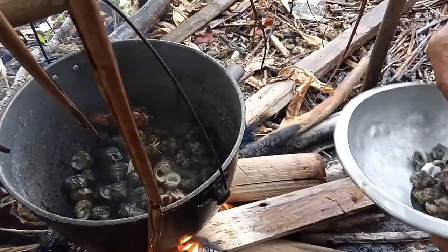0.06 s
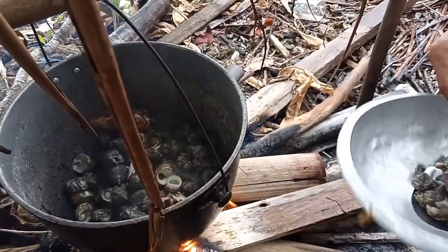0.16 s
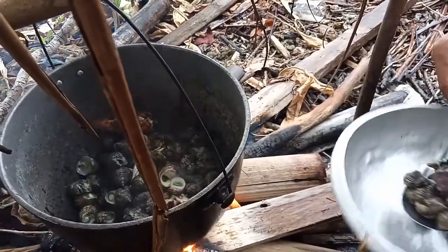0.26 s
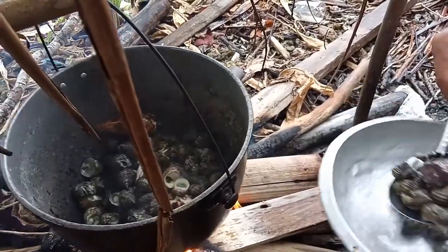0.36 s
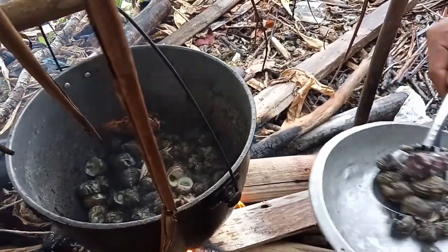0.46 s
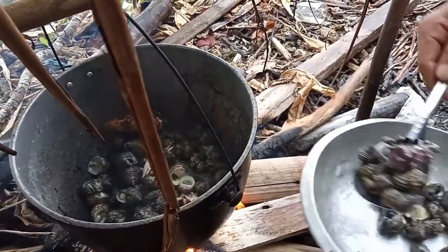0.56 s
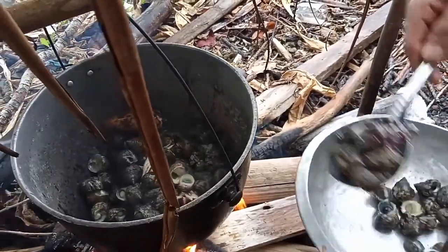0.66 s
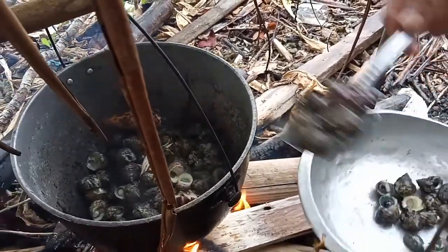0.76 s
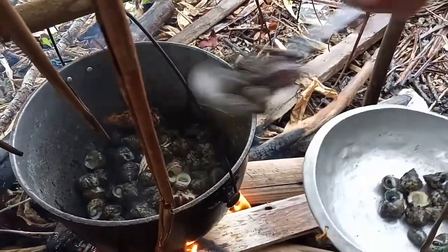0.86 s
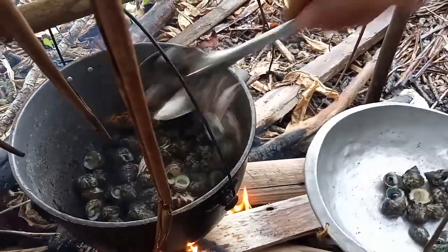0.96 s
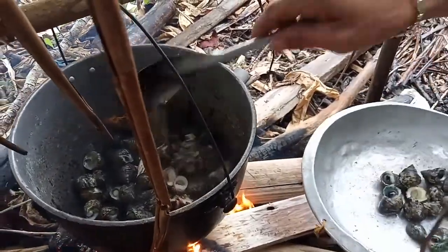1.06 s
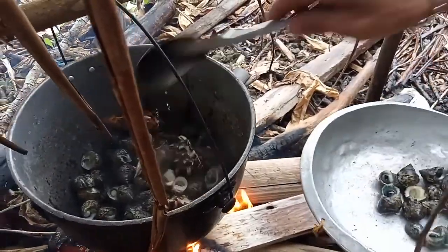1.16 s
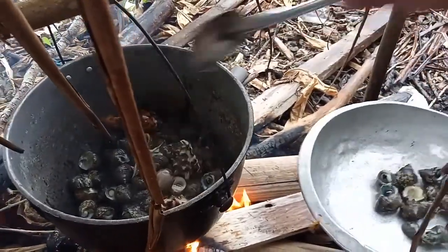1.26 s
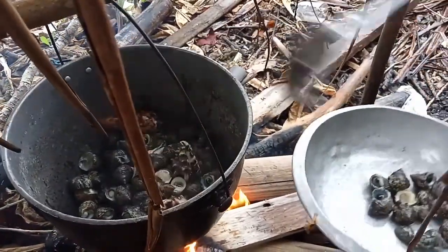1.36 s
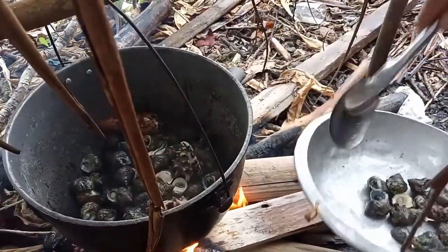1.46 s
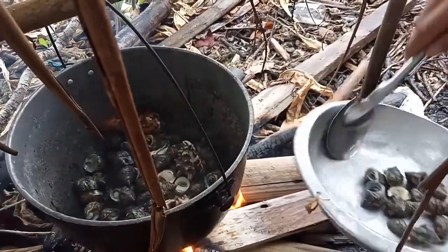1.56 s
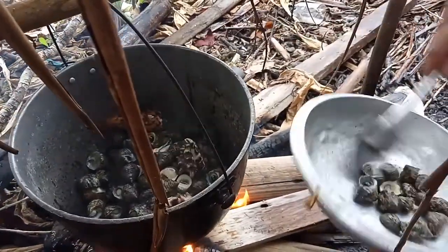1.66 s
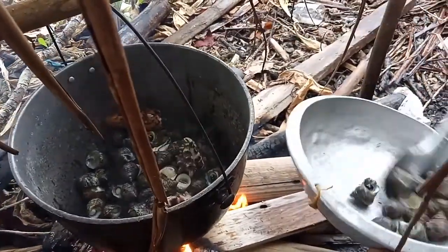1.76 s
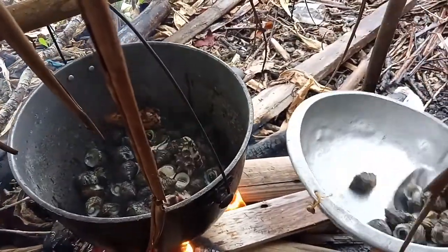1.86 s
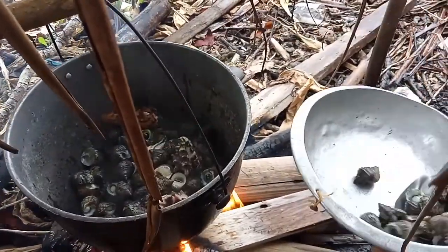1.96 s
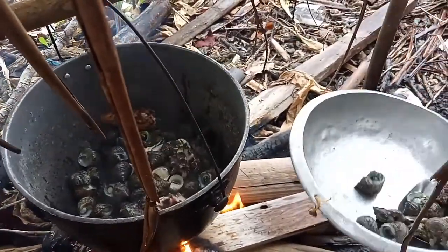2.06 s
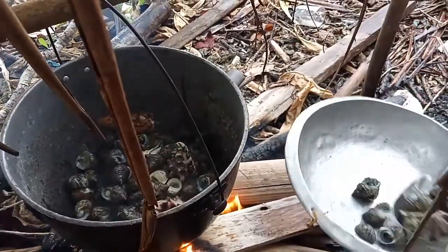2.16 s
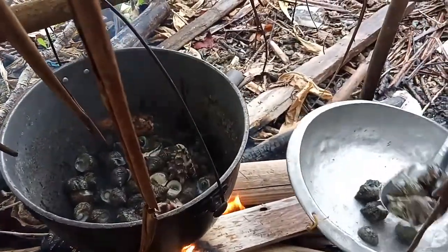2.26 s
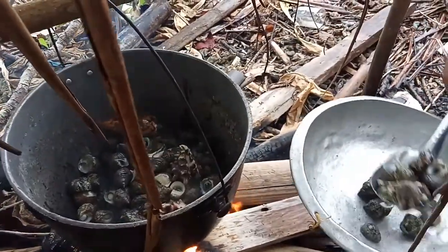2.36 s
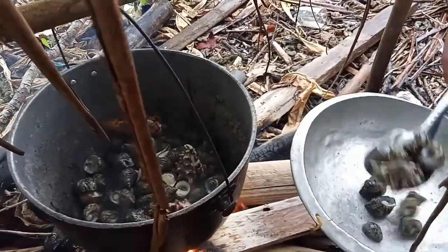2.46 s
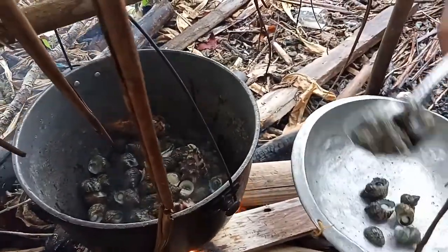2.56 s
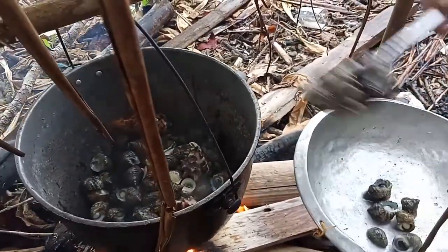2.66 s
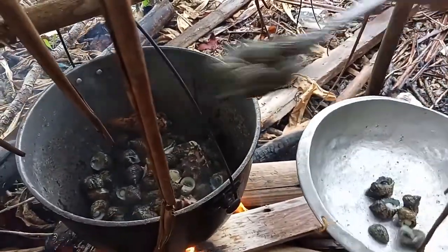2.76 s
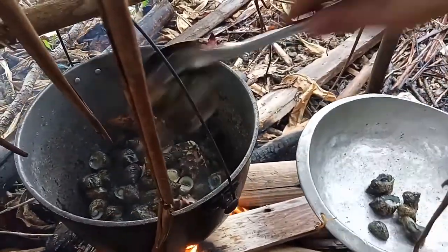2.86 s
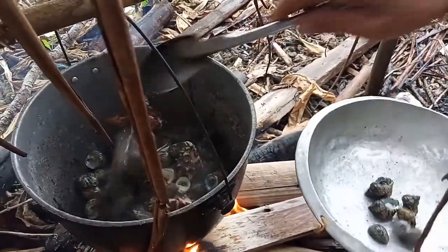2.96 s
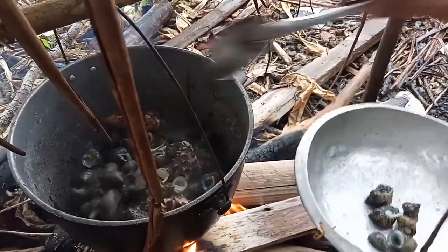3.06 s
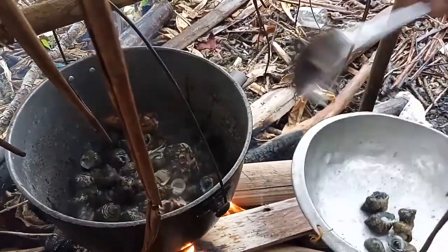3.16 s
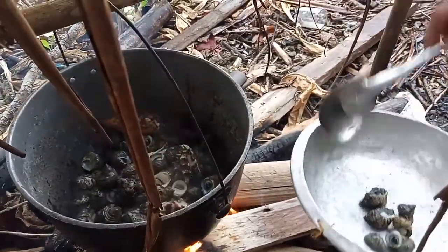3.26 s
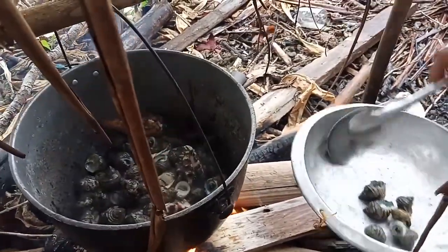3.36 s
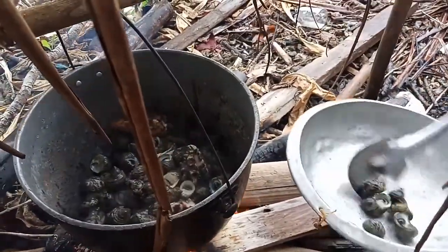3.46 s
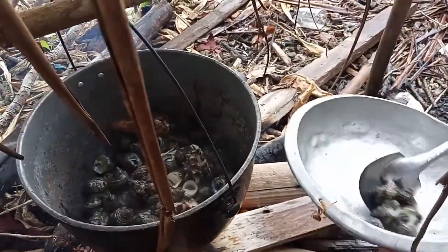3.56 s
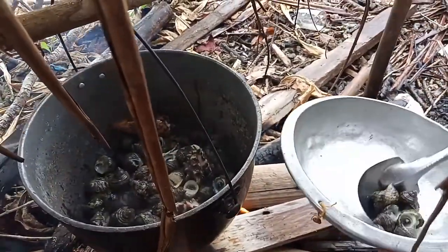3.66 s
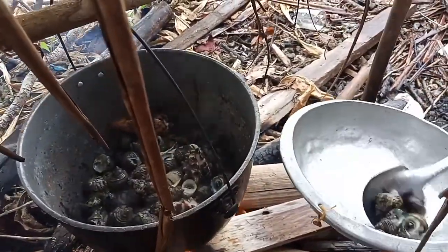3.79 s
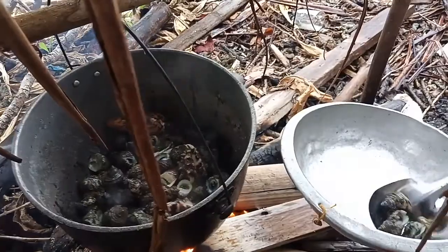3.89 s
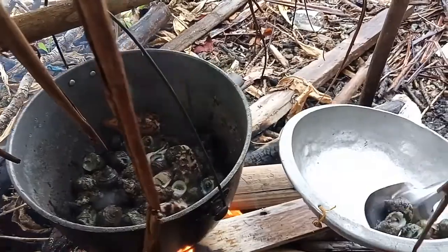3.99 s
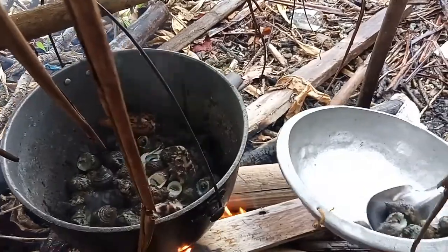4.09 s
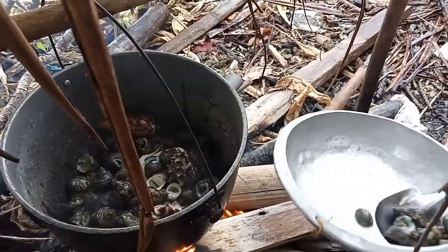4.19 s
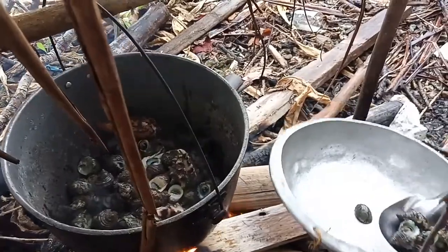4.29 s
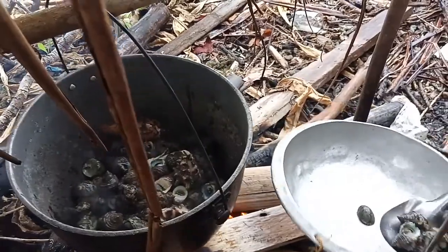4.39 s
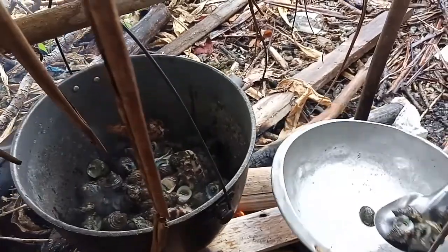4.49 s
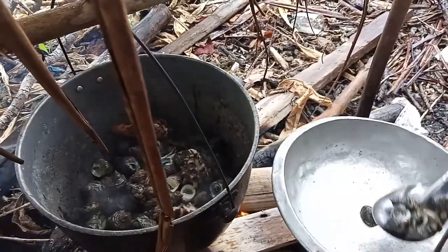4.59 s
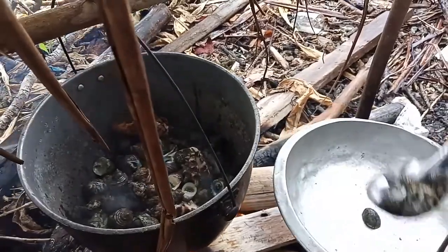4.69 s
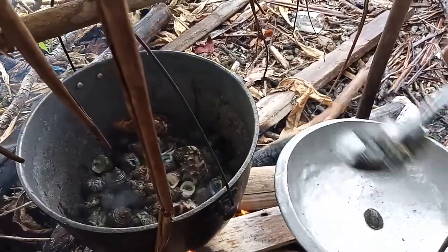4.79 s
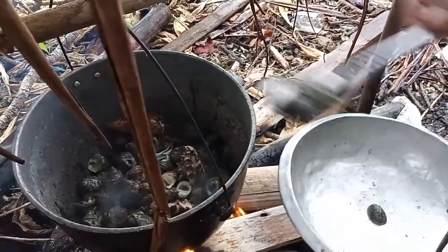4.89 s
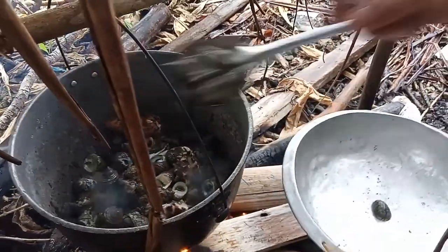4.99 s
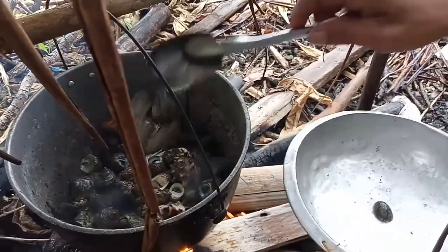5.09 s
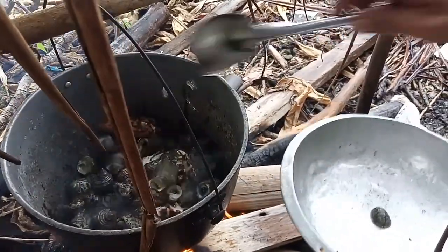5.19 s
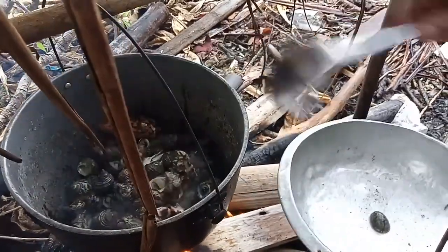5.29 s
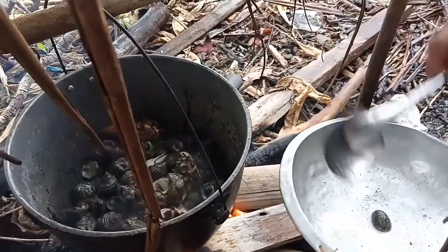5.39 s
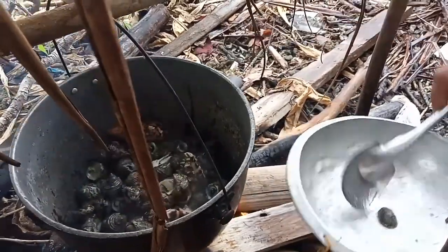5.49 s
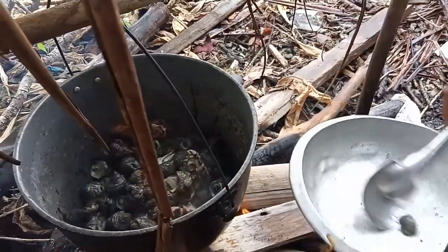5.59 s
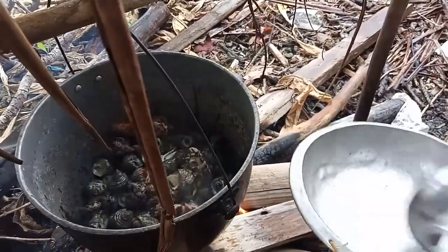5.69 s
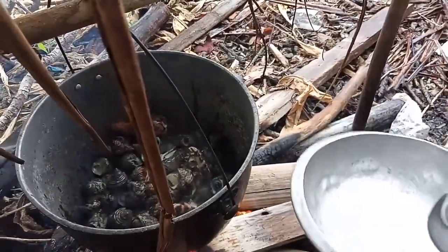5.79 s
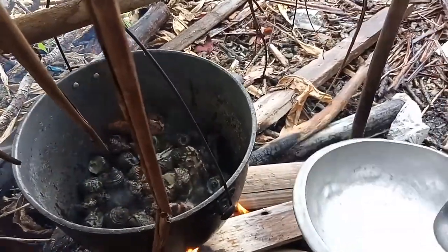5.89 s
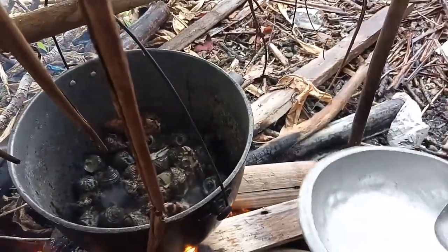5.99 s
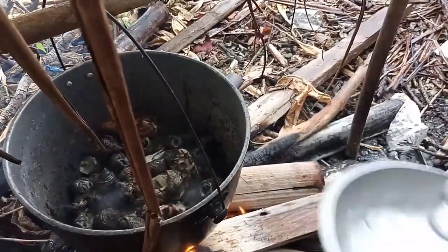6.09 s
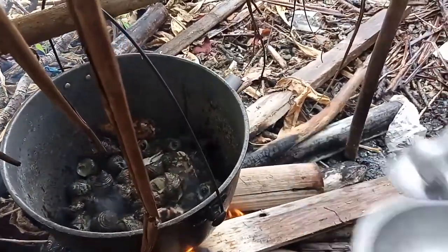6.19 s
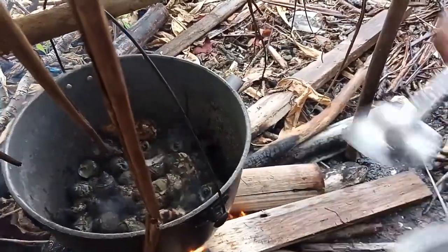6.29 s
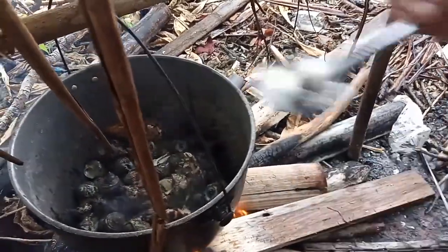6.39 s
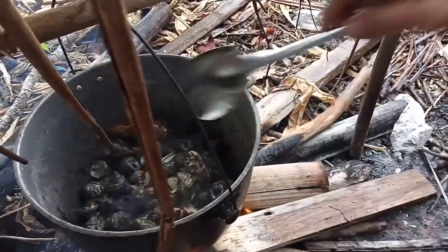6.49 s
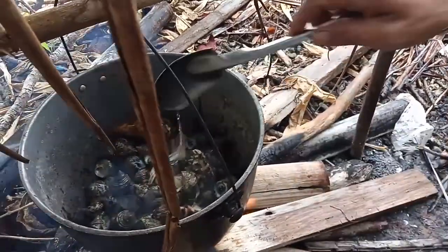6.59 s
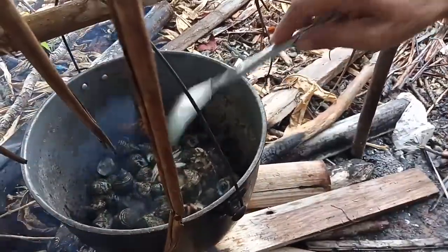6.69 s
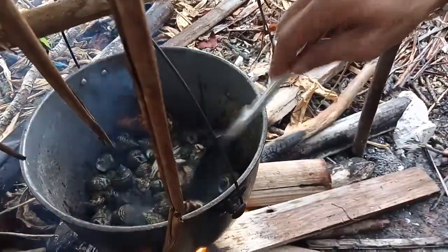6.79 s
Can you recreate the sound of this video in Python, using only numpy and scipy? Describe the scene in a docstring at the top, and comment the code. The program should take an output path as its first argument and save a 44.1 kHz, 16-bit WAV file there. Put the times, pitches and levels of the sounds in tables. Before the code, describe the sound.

Bright, clanky shell rattles alternate between a ringing metal basin and a duller pot, with steady sizzle and small fire pops close by.

```python
"""Scooping shells over a wood fire

Sea snail shells are scooped with a steel spoon from a thin metal basin and tipped into a pot over a wood fire.
Knocks are bursts of noise sent through the ringing notes of basin or pot, with a short shell note added.
Scrapes are rubbing noise and tiny clicks through the basin, plus singing metal; thuds are low, short swings.
Behind them, shaped noise makes the hot pot sizzle and the fire rumble, spit and whistle once.
"""
import sys
import numpy as np
from scipy import signal
from scipy.fft import rfft, irfft, next_fast_len
from scipy.io import wavfile
from scipy.ndimage import uniform_filter1d, map_coordinates

SR = 44100
rng = np.random.default_rng(int(sys.argv[2]) if len(sys.argv) > 2 else 0)


def file_out(sig):
    """Save sig as 16-bit WAV at sys.argv[1]."""
    # one column per channel
    cols = np.atleast_2d(sig).T
    # limit, then scale
    lim = np.clip(cols, -1, 1)
    pcm = np.round(lim * 32767).astype(np.int16)
    wavfile.write(sys.argv[1], SR, pcm)


N = 301996

# Spoon and shells on the basin; belly and treble are relative to the knock level:
# (time [s], level [dB], belly [dB], treble [dB], time for the contact to fade by 60 dB [s], shell pitch [Hz])
BASIN_HITS = [(1.5963, -5.5, -13.5, -11.5, .073, 2706), (1.6205, -6.5, -12, -8.5, 0.05, 2880),
              (1.6698, -26, -11, -20, 0.053, 1020), (1.6698, -14.5, -23, -5, .073, 3800),
              (1.684, -12.5, -30, -4, 0.1, 3970), (1.709, -1, -11, -14.5, 0.094, 2400),
              (1.737, -10, -8.5, -4, 0.063, 2320), (1.7593, -1.5, -17, -6, 0.059, 2400),
              (1.811, -10, -27, -21, 0.028, 3260), (1.8282, -8.5, -24, -7, .1, 3330),
              (1.855, -11.5, -25, -8, 0.07, 2920), (1.8674, -16, -10, -19, .058, 2470),
              (1.9265, -11, -10, -17, 0.05, 2390), (1.9391, -7, -24, -11.5, 0.019, 2360),
              (1.9982, -15, -21, -15, 0.051, 3010), (2.0901, -12.5, -19, -16, 0.017, 1580),
              (2.1264, -16, -8, -32, .15, 2440), (2.2423, -13, -7, 0, 0.059, 3880),
              (2.2847, -14, -10, -23, 0.09, 2780), (2.3146, -19, -11, -24, 0.044, 3000),
              (2.3765, -3, -7.5, -8.5, 0.048, 2040), (2.4054, -15.5, 3, -2, 0.072, 2220),
              (2.4116, -4.5, -10, -7.5, .062, 2280), (2.4972, 0, -10.5, -6, 0.042, 2990),
              (2.575, -15, -9.5, -8, 0.046, 2980), (2.6198, -24, -7, -12, .03, 1500),
              (2.7064, -23.5, 2.5, -18, .043, 2500), (2.7272, -24, -10, -24, .075, 3630),
              (2.7407, -18.5, -15, -27, 0.044, 3050), (3.3753, 0.5, -16, -10, 0.038, 2150),
              (3.4475, -7.5, -12, -6.5, 0.097, 2617), (3.4886, -13, -32, -24, .063, 4030),
              (3.5284, 1, -19, -9.5, 0.067, 3030), (3.5887, -8, -8.5, -9, 0.041, 2980),
              (3.6136, -8, -16, -8, 0.15, 2410), (3.6435, -15, -29, -16, 0.059, 3200),
              (3.8627, -9.5, -32, -8.5, 0.17, 3020), (3.9053, -17.5, -36, -27, .15, 3200),
              (3.9475, -15, -12.5, -10, 0.07, 2940), (4.0313, -27.5, 2, -22, .11, 2840),
              (4.1457, -13.5, -12.5, -10, 0.087, 1950), (4.1994, -15.5, -13, -18, 0.086, 3130),
              (4.2383, -12.5, -22, -30, 0.053, 3090), (4.4752, -20, -20, -12, 0.049, 2920),
              (4.69, -21.5, -6.5, -15, .023, 2750), (5.6022, -28, -5, -9, 0.051, 1790),
              (5.6251, -3, -15, -10, .11, 3650), (5.6464, -7.5, -17, -13.5, 0.23, 2990),
              (5.7261, -8.5, -10, -14, 0.039, 2980), (5.7577, -7, -23, -12, .1, 1920),
              (5.8067, -9, -12, -7.5, 0.16, 2400)]
# Shells landing in the pot or shifting in the spoon, same columns:
# (time [s], level [dB], belly [dB], treble [dB], time for the contact to fade by 60 dB [s], shell pitch [Hz])
POT_HITS = [(0.1157, -23, -6, -18, 0.026, 890), (0.164, -23, -14, -11, 0.019, 2140),
            (0.913, -24, -30, -20, 0.026, 1750), (0.9386, -19.5, -35, -22, .038, 1840),
            (0.9666, -16, -23, -20, 0.032, 2250), (0.977, -7, -16.5, -3.5, 0.043, 4050),
            (0.9908, -8, -13, -2.5, 0.022, 2600), (1.013, -29, -27, -8, .031, 3150),
            (1.0984, -8, -14, 6.5, .039, 4620), (1.1195, -5, -9.5, -6, 0.036, 1940),
            (1.1413, -3.5, -6.5, -2.5, 0.028, 2630), (1.1527, -5, -34, -7, 0.053, 2110),
            (1.173, -7, -15.5, 1, 0.079, 4080), (1.1961, -17.5, -12, -4, 0.067, 3360),
            (1.2206, -19, -14, -5, .072, 3640), (1.2416, -22, -10, -1.5, 0.043, 2520),
            (1.253, -19.5, -18, -12, 0.036, 2920), (1.2695, -28.5, -5, 5, 0.088, 3000),
            (1.4185, -24.5, -14, -8, .042, 3360), (1.483, -21, -11.5, -14, .026, 2450),
            (2.8726, -21.5, -17, -10, 0.046, 2490), (2.9635, -20, -32, -0.5, 0.061, 3350),
            (2.9777, -17, -35, -5, 0.025, 2920), (3.0183, -2, -24.5, -7.5, 0.037, 2410),
            (3.0375, -13.5, -12, -4, 0.076, 2100), (3.0532, -12, -15, -5, 0.12, 3150),
            (3.0816, -3, -17, -12, .04, 2470), (3.1046, -17, -7, -12, 0.064, 3200),
            (3.116, -10.5, -17.5, 0.5, 0.077, 2410), (3.1482, -17, -12, -8, 0.074, 2380),
            (3.1845, -13.5, -13, -14, 0.042, 2380), (3.2022, -24, -14, -17, 0.051, 2430),
            (3.2215, -12, -11.5, -8, .039, 2420), (3.2432, -16.5, -17, -2, 0.034, 3130),
            (3.255, -8.5, -10, -2, .032, 4350), (3.295, -23, -7, -17, 0.045, 2300),
            (5.0905, -26.5, -35, -5.5, 0.065, 2540), (5.1134, -14, -24, -0.5, .049, 2520),
            (5.1346, -19, -27, -26, .048, 2510), (5.1768, -24, -18, -5, .035, 2520),
            (5.2095, -6, -11.5, -1, 0.043, 2580), (5.2232, -16, -10, -6, .044, 2380),
            (5.2321, -3.5, -17, -11, 0.031, 1870), (5.2458, -12, -6.5, 2, .059, 3070),
            (5.2564, -9, -20, -4, 0.04, 3230), (5.2674, -9, -28, -10, 0.017, 2200),
            (5.2792, -13, -17, -12, 0.042, 1870), (5.299, -12, -24, -8, 0.069, 2460),
            (5.3073, -14.5, -2.5, -9, 0.03, 560), (5.351, -8, -16, 0, 0.027, 2610),
            (5.3635, -16.5, -21, -26, .052, 2700), (5.3925, -19, -7, -8, 0.042, 1670),
            (5.4945, -31.5, -1, -13, .039, 2290), (6.5883, -27, -35, 3, 0.019, 2240),
            (6.6968, -23.5, -8, -3, 0.03, 3400), (6.7027, -28, -14, 6, 0.028, 3160)]
# Ringing notes of the basin: (pitch [Hz], width [Hz], level [dB])
BASIN_MODES = [(658, 74, 1.5), (1096, 34, -6.5), (1479, 31, -5.5), (2007, 18, -1), (2400, 23.5, 1.5),
               (2990, 48, -6), (3517, 14, -2.5), (3850, 130, -10), (4130, 97, -17), (4550, 17, -6.5),
               (5400, 110, -16), (5840, 27, -26), (7720, 720, -5)]
# Ringing notes of the pot: (pitch [Hz], width [Hz], level [dB])
POT_MODES = [(112, 70, -19), (580, 180, -11), (1085, 60, -7), (2080, 90, -12), (2420, 240, -11),
             (3300, 90, -11), (3750, 210, -14), (4220, 80, -13), (6100, 200, -19), (7150, 220, -14),
             (7950, 350, -15), (8650, 250, -20)]
# Shape of the contact noise between the ringing notes: (frequency [Hz], level [dB])
CLACK_SHAPE = [(35, -97), (60, -22), (334, 3), (611, 8), (1090, -2.5), (1280, -11.5), (1510, -9),
               (2960, -5), (5810, -18.5), (7680, -20), (9910, -33), (13700, -27), (15400, -29)]
# Borders between thump, belly, body and treble: (frequency [Hz])
BAND_EDGES = (300, 1300, 5000)
# Heavy landings that shake a whole vessel: (time [s], level [dB], pitch [Hz])
HEAVY_LANDINGS = [(1.0995, -18, 110), (1.1403, -28, 130), (1.5963, -32, 220), (1.6208, -29, 199),
                  (1.7593, -28, 110), (2.622, -40, 90), (3.018, -38, 130), (3.4463, -20.5, 223),
                  (5.2104, -29, 111), (5.6252, -16, 264)]
# Shells rubbing over metal; belly, treble and ringing are relative to the scrape:
# (start [s], swell [s], hold [s], fade [s], scrape [dB], belly [dB], treble [dB], ringing pitch [Hz], ringing [dB])
RUB_STROKES = [(0.932, 0.063, .025, 0.027, -26.5, -24, -10, 2200, -4),
               (1.608, 0.017, 0.032, 0.017, -32.5, -1, -20, 2885, 5),
               (1.672, 0.061, 0.062, 0.073, -18.5, -15.5, -12, 2374, -9),
               (1.782, 0.028, 0.073, 0.24, -22, -11.5, -14, 2400, -9),
               (1.898, 0.042, 0.11, 0.24, -32, -4, -23, 2864, -0.5),
               (2.232, 0.024, 0.095, 0.044, -32, 1.5, -8.5, 2933, 5.5),
               (2.679, 0.041, 0.024, 0.028, -41.5, 5, -14, 3340, 5),
               (2.919, 0.025, 0.034, .02, -33, -25, -10, 2160, 3.5),
               (2.952, 0.023, 0.0054, 0.011, -39.5, -20, -1, 3200, 19.5),
               (3.444, 0.0086, 0.015, 0.035, -25, -0.5, -4, 2440, -3),
               (3.471, 0.022, 0.035, .02, -27, -18, -3.5, 3900, 8.5),
               (3.523, .014, .03, .05, -18.5, -14, -11.5, 2893, -2),
               (3.569, 0.033, 0.032, .16, -21.5, -12, -12, 3096, 0.5),
               (3.798, 0.051, 0.071, 0.12, -23.5, -14.5, -11.5, 3020, -11),
               (3.977, 0.053, 0.054, 0.11, -33, -5, -16, 3300, -4.5),
               (4.132, 0.042, 0.098, 0.037, -34, -6.5, -6, 2985, 9),
               (4.249, 0.038, 0.093, 0.042, -29, -14.5, -13, 3110, 3.5),
               (5.076, 0.03, 0.034, 0.024, -28, -30, -9, 2538, 7),
               (5.624, 0.011, .03, .03, -24.5, -15, -5, 3670, 2),
               (5.652, 0.11, .01, 0.06, -16.5, -15.5, -11, 2930, -9),
               (5.776, 0.022, 0.04, 0.047, -24, -8.5, -8.5, 2400, 2),
               (5.844, 0.015, 0.05, 0.044, -32, -5, -5, 2620, -16),
               (6.525, 0.072, 0.0083, 0.028, -28.5, -34, -10, 2100, -2.5)]
# Start and end of a stroke against its hold, for scrape, belly, treble and ringing: (level [dB])
STROKE_EDGES = [-22, -16, -18.5, -17.5]
# Notes of the rubbed metal: (ratio to the ringing pitch [times], level [dB])
SONG_PARTIALS = [(0.668, -15.5), (1.001, -2.5), (1.22, -10)]
# High notes of the spoon: (pitch [Hz], width [Hz], level [dB])
SPOON_MODES = [(9250, 150, -14), (10400, 80, 0), (10900, 80, -5), (13200, 200, -10)]
# The last shell slips off the spoon: (time [s], level [dB])
SPOON_SHAKE = [(6.575, -70), (6.59, -41), (6.615, -32), (6.63, -70)]
# Spits of the fire: (time [s], peak level [dB])
FIRE_SPITS = [(0.395, -26), (0.41, -25), (0.535, -24), (0.749, -28), (0.856, -23), (4.991, -23),
              (6.177, -24), (6.309, -22.5), (6.384, -10.5), (6.399, -14), (6.796, -32)]
# Steam from a log: (time [s], pitch [Hz], level before its random flutter [dB])
STEAM_WHISTLE = [(6.4, 5000, -70), (6.43, 5470, -49), (6.46, 6360, -48), (6.485, 7450, -48),
                 (6.5, 7800, -70)]
# Shape of the sizzle: (frequency [Hz], level [dB])
SIZZLE_SHAPE = [(240, -63), (400, -22), (519, -6), (715, -13.5), (1110, -3.5), (1530, -6.5), (1660, 1),
                (1760, 0), (3290, 2), (4680, -11), (6450, -16), (7860, -9), (9740, -21.5), (13600, -16),
                (15400, -16.5)]
# Shape of the fire's rumble: (frequency [Hz], level [dB])
RUMBLE_SHAPE = [(15, -59), (25, -29), (27, -30), (86, -0.5), (242, 0.5), (370, -3), (500, 3.5), (650, -26),
                (1100, -120)]
# Background over time: (time [s], sizzle before its random wobble [dB], rumble [dB])
BACKGROUND = [(0.0, -35.5, -58), (1.56, -37, -58.5), (1.81, -31.5, -64), (2.42, -37, -49),
              (2.82, -36.5, -59), (3.53, -35, -59.5), (4.33, -34.5, -57.5), (6.85, -36.5, -59.5)]

SIZE = 8192  # samples used to work out a vessel's ring
TOP_HZ = 16400  # the microphone's upper limit
THUD_CYCLES = 4.5  # swings until a thud has lost 60 dB
BLOW, BLOW_PEAK_S = 0.83, 0.0026  # extra push of the main contact, and when that push is strongest


def knocks(rows, modes, clack_db, rise, shell_db, shell_t60, belly_hz, belly_t60, thump_db):
    """A knobbly shell touches many times within a few ms; the vessel rings and the shell adds its own short note."""
    out, t = np.zeros(N + SR), np.arange(SIZE // 2) / SR

    def note(drive, hz, t60):
        """A fading tone set off by the contact."""
        tone = np.sin(2 * np.pi * hz * t) * amp(-60 * t / t60)
        return peak(signal.fftconvolve(drive, tone))

    for s, db, belly_db, treble_db, t60, hz in rows:
        # each spot struck and each load of shells shifts the ringing notes
        spot = rng.standard_normal((len(modes), 2))
        shifted = [(c * (1 + 0.028 * a), w, level + 3.4 * b) for (c, w, level), (a, b) in zip(modes, spot)]
        answers = vessel(shifted, clack_db)

        knobs = rng.standard_normal(len(t) // 32).repeat(32)
        touch = rng.standard_normal(len(t)) * amp(3.5 * knobs)
        main_blow = 1 + BLOW * t / BLOW_PEAK_S * np.exp(1 - t / BLOW_PEAK_S)
        touch = touch * amp(-60 * (t / t60) ** 1.57) * (1 - np.exp(-t / rise)) * main_blow
        push = touch * amp(-60 * t / 0.058)  # the low notes answer mostly to the first contact

        rings = signal.fftconvolve([push, push, touch, touch], answers, axes=1)
        thump, belly, body, treble = peak(rings)
        body = body + amp(shell_db) * note(touch, hz, shell_t60)
        belly = belly + amp(-8.0) * note(push, belly_hz, belly_t60)
        levels = db + np.array([thump_db, belly_db, 0, treble_db])
        mixed = amp(levels) @ [thump, belly, body, treble]
        # wet shells settle on the metal and choke its ring
        damped = amp(-56) + amp(-60 * (t / (2.25 * t60)) ** 2)
        out[round(s * SR):][:len(t)] += damped * mixed[:len(t)]
    return out[:N]


def vessel(modes, clack_db):
    """How a vessel rings after a tap, split into thump, belly, body and treble."""
    f = np.fft.rfftfreq(SIZE, 1 / SR)
    power = (amp(clack_db) * along(CLACK_SHAPE, f)) ** 2
    for c, w, db in modes:
        power = power + amp(db) ** 2 * (f * w) ** 2 / ((c * c - f * f) ** 2 + (f * w) ** 2)
    power = power / (1 + (f / 15500) ** 80) / (1 + (75 / (f + 1)) ** 8)
    below = [0 * f] + [1 / (1 + (f / edge) ** 8) for edge in BAND_EDGES] + [1 + 0 * f]
    bands = power * np.diff(below, axis=0)
    # minimum phase: the ring starts at the tap and packs its energy as early as it can
    cepstrum = irfft(np.log(bands + 1e-12) / 2)
    cepstrum[:, 1:SIZE // 2] *= 2
    cepstrum[:, SIZE // 2 + 1:] = 0
    return irfft(np.exp(rfft(cepstrum)))[:, :SIZE // 2]


def thuds():
    """The vessel gives one low, heavily damped swing."""
    out, t = np.zeros(N + SR), np.arange(SIZE) / SR
    for s, db, hz in HEAVY_LANDINGS:
        swing = amp(db - 60 * t * hz / THUD_CYCLES) * np.sin(2 * np.pi * hz * t)
        out[round(s * SR):][:len(t)] += swing
    return signal.lfilter(*signal.butter(2, 60, "highpass", fs=SR), out[:N])


def drags(answers, rate, slips):
    """Dense tiny collisions on a bed of rubbing noise drive the basin; shells ping and the rubbed metal sings."""
    # rate: average collisions a second
    ticks = (rng.random(N) < rate / SR) * amp(3 * rng.standard_normal(N)) * rng.choice([-1, 1], N)
    drive = amp(3 * wobble(60)) * (1.1 * unit(ticks) + rng.standard_normal(N))
    # the spoon edge sticks and slips, around "slips" times a second at an uneven pace
    slip_count = np.floor(np.cumsum(slips * amp(4 * wobble(30)) / SR))
    judder = np.diff(slip_count, prepend=0)

    rings = signal.fftconvolve(drive[None], answers, axes=1)[:, :N]
    _, belly, body, treble = (unit(p) for p in rings)
    judder_ring = signal.fftconvolve(judder * amp(3.6 * wobble(50)), answers[1])[:N]
    belly = unit(belly + 0.73 * unit(judder_ring))
    body = unit(body + 0.9 * pings(np.full(N, 2800.), spread=0.22, t60=0.018, count=4000))

    gain, hz = strokes()
    song = sum(amp(db) * pings(ratio * hz, spread=0.0088, t60=0.13, count=2000) for ratio, db in SONG_PARTIALS)
    return gain[0] * body + gain[1] * belly + gain[2] * treble + gain[3] * song


def strokes():
    """Each stroke swells, holds and fades; the metal sings at the pitch of the stroke that rings loudest."""
    t, power = np.arange(N) / SR, np.zeros((4, N))
    hz, loudest = np.full(N, 2800.), np.zeros(N)
    for s, swell, hold, fade, db, belly_db, treble_db, pitch_hz, ring_db in RUB_STROKES:
        corners = s + np.cumsum([0, swell, hold, fade])
        # 0 = full hold level, 1 = start or end level, 10 = practically silent outside the stroke
        under = np.interp(t, corners, [1, 0, 0, 1], 10, 10)
        hold_db = db + np.array([[0], [belly_db], [treble_db], [ring_db]])
        layers = amp(hold_db + np.outer(STROKE_EDGES, under))
        hz = np.where(layers[3] > loudest, pitch_hz, hz)
        loudest = np.maximum(loudest, layers[3])
        power = power + layers ** 2
    return uniform_filter1d(np.sqrt(power), 400, axis=1), hz


def pings(centre_hz, spread, t60, count):
    """Short damped notes at random moments, pitched around a moving centre."""
    draw, t = rng.random((count, 3)), np.arange(SIZE // 8) / SR
    start = (draw[:, 0] * N).astype(int)
    hz = centre_hz[start] * np.exp(spread * rng.standard_normal(count))
    fade = amp(12.5 * draw[:, 1:2] - 60 * t / t60)
    tone = np.sin(2 * np.pi * (hz[:, None] * t + draw[:, 2:]))
    notes = fade * tone * (1 - np.exp(-t / 0.00085))
    places = start[:, None] + np.arange(len(t))
    return unit(np.bincount(places.ravel(), notes.ravel(), N)[:N])


def sparkle():
    """A shell sliding off the empty spoon wakes its highest notes: noise through narrow bands."""
    def spoon_gain(f):
        return np.sqrt(sum(amp(db) ** 2 / (1 + (2 * (f - c) / w) ** 4) for c, w, db in SPOON_MODES))

    level_db = curves(SPOON_SHAKE, outside=-200)[0]
    return amp(level_db) * unit(coloured(rng.standard_normal(N), spoon_gain))


def spits():
    """Wood pockets burst as single dull pulses with a short puff; steam whistles upward once."""
    out, t = np.zeros(N + SR), np.arange(SIZE // 8) / SR
    dull = signal.butter(2, (450, 3000), "bandpass", fs=SR)
    for s, db in FIRE_SPITS:
        puff = 0.071 * amp(-60 * t / 0.05) * rng.standard_normal(len(t))
        burst = (t == 0) + puff
        out[round(s * SR):][:len(t)] += amp(db) * peak(signal.lfilter(*dull, burst))
    hz, db = curves(STEAM_WHISTLE)
    db = db - 60 * (db <= db[-1])  # push it far down before and after the whistle
    whistle = amp(db + 3.9 * wobble(250)) * np.sin(2 * np.pi * np.cumsum(hz) / SR)
    return out[:N] + whistle


def fire():
    """Wet shells sizzle in the hot pot as flickering hiss and sharp specks; the flames rumble as low noise."""
    sizzle_db, rumble_db = curves(BACKGROUND)
    # random patches over pitch and time make the hiss flicker
    z = signal.stft(rng.standard_normal(N), nperseg=512)[2]
    field = uniform_filter1d(uniform_filter1d(rng.standard_normal(z.shape), 6, 0), 8, 1)
    hiss = signal.istft(z * amp(1.3 * unit(field)), nperseg=512)[1][:N]
    specks = (rng.random(N) < 300 / SR) * amp(4.5 * rng.standard_normal(N))  # about 300 a second
    raw_sizzle = unit(hiss) + 0.21 * unit(specks)
    sizzle = unit(coloured(raw_sizzle, lambda f: along(SIZZLE_SHAPE, f) * (f < 15500)))
    low_noise = coloured(rng.standard_normal(N), lambda f: along(RUMBLE_SHAPE, f))
    rumble = unit(amp(2 * wobble(8)) * low_noise)
    return amp(sizzle_db + 0.52 * wobble(19)) * sizzle + amp(rumble_db) * rumble


def amp(db):
    """Decibels to gain."""
    return 10 ** (np.asarray(db) / 20)


def unit(x):
    """x at an average strength (rms) of 1."""
    return x / np.sqrt(np.mean(x ** 2) + 1e-20)


def peak(x):
    """x at peak 1."""
    return x / np.abs(x).max(axis=-1, keepdims=True)


def along(points, hz):
    """(frequency [Hz], level [dB]) points joined on a log frequency axis, as gain."""
    f, v = np.transpose(points)
    return amp(np.interp(np.log(hz + 1), np.log(f + 1), v))


def curves(rows, outside=None):
    """One value per sample for each column after the time."""
    s, *cols = np.transpose(rows)
    return [np.interp(np.arange(N) / SR, s, c, outside, outside) for c in cols]


def wobble(rate):
    """A smooth random curve through "rate" random points a second."""
    points = rng.standard_normal(int(N * rate / SR) + 4)
    return map_coordinates(points, [np.arange(N) * rate / SR])


def coloured(x, gain):
    """x times a gain over frequency."""
    m = next_fast_len(N + SIZE)
    return irfft(rfft(x, m) * gain(np.fft.rfftfreq(m, 1 / SR)), m)[:N]


def scene():
    """Shells, spoon and fire in the open air, added together without echo."""
    basin = knocks(BASIN_HITS, BASIN_MODES, clack_db=-6, rise=0.00084, shell_db=-9.5, shell_t60=0.09,
                   belly_hz=656, belly_t60=0.058, thump_db=-32.5)
    pot = knocks(POT_HITS, POT_MODES, clack_db=-2.0, rise=0.00079, shell_db=-7.5, shell_t60=0.029,
                 belly_hz=1048, belly_t60=0.23, thump_db=-57)
    scrapes = drags(vessel(BASIN_MODES, clack_db=-15), rate=380, slips=60)
    return (basin + pot + thuds() + scrapes + sparkle() + spits() + fire())[None]


def record(dry):
    """Peaks round off softly; the microphone drops the deepest bass and all above its band limit."""
    soft = dry[0] / (1 + np.abs(dry[0] / 0.95) ** 6) ** (1 / 6)
    return coloured(soft, lambda f: (f < TOP_HZ) * f * f / np.hypot(f * f, 45 ** 2))[None]


dry = scene()
out = record(dry)
file_out(out)
```